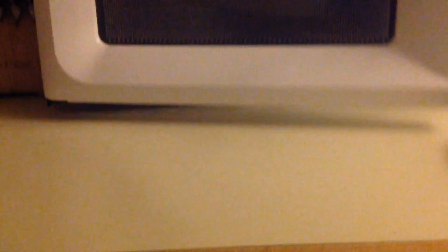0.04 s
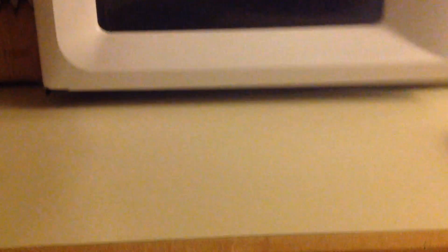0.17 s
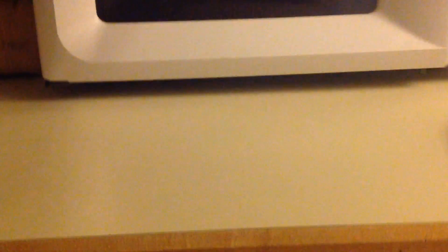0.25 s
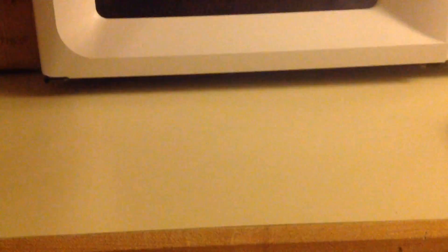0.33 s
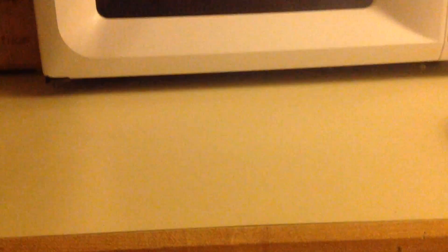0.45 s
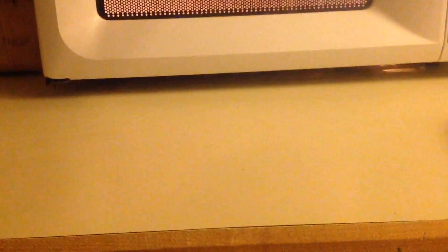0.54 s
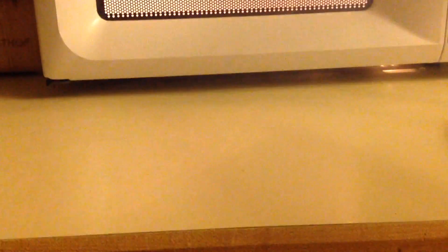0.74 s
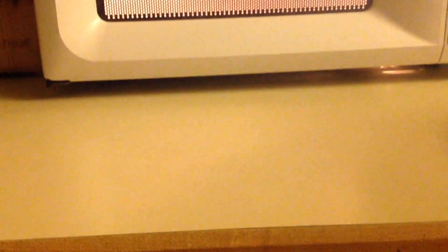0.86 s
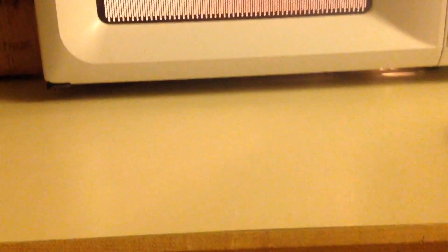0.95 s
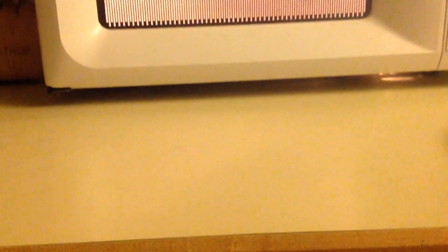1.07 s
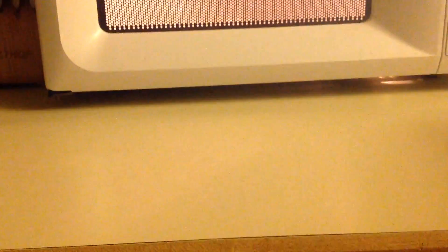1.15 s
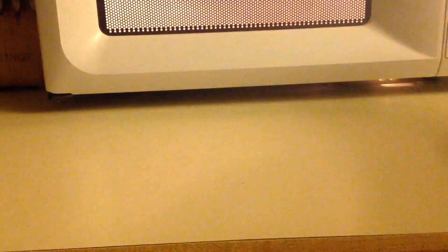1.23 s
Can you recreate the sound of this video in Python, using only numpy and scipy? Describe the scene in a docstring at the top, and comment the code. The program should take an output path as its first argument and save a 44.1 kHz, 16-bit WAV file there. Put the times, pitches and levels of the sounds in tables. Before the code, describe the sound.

Plastic knocks of a microwave door latching shut, followed by a soft electric hum.

```python
"""First come a few plastic knocks: a microwave door is pushed shut, close by in a small kitchen.
Its latch hooks meet their ramps, scrape and squeak over them, then snap in as the door hits the cabinet.
Each blow makes the door, the cabinet and the latch ring. Then the oven starts: the transformer hums,
a fan blows, there is a faint tick like a relay's, and a soft buzz joins over the quiet room."""
import sys
import numpy as np
from scipy import signal
from scipy.fft import rfft, irfft
from scipy.io import wavfile
from scipy.ndimage import uniform_filter1d

SR = 44100
rng = np.random.default_rng(int(sys.argv[2]) if len(sys.argv) > 2 else 0)


def pcm_store(signal):
    """Save signal as 16-bit PCM."""
    levels = np.round(np.clip(np.atleast_2d(signal), -1, 1) * 32767)
    wavfile.write(sys.argv[1], SR, levels.astype(np.int16).T)


N = 57330
MAINS_HZ = 60


def gain(db):
    """Turn decibels into a number to multiply a sound by."""
    return 10 ** (np.asarray(db) / 20)


def at_pitch(hz, points):
    """Read between (frequency, value) points, giving every octave the same width."""
    freqs, values = np.array(points, float).T
    return np.interp(np.log(np.maximum(hz, 1)), np.log(freqs), values)


def noise(colour, peaky_db=0, peak_width_hz=32):
    """Noise of average strength (rms) 1, shaped by a colour table; peaky_db adds random narrow peaks."""
    hz = np.fft.rfftfreq(N, 1 / SR)
    heights = np.clip(rng.standard_normal(4096), -3, 1.2)
    peaks = np.interp(hz / peak_width_hz, np.arange(4096), heights)
    white = rfft(rng.standard_normal(N))
    shaped = irfft(white * gain(at_pitch(hz, colour) + peaky_db * peaks), N)
    return shaped / shaped.std()


def wander(rate_hz):
    """A smooth random drift, typically about 1 up or down."""
    width = max(int(SR / rate_hz), 1)
    drift = uniform_filter1d(uniform_filter1d(rng.standard_normal(N), width), width)
    return drift / drift.std()


def since(start):
    """Seconds since a moment, zero before it."""
    return np.maximum(np.arange(N) / SR - start, 0)


def fade_in(start, rise_s):
    """A straight rise from 0 to 1."""
    return np.minimum(since(start) / rise_s, 1)


def ring(age, rise_s, ring_s):
    """Rise quickly, then die away; the ring time is how long a fall of 60 dB takes."""
    return (1 - np.exp(-age / rise_s)) * np.exp(-np.log(1000) * age / ring_s)


def octaves(sound):
    """Split a sound into overlapping octaves, each given as (centre frequency, band)."""
    centres = 125 * 2. ** np.arange(8)
    spectrum, hz = rfft(sound), np.fft.rfftfreq(N, 1 / SR)
    for centre in centres:
        share = at_pitch(hz, list(zip(centres, centres == centre)))
        yield centre, irfft(spectrum * share, N)


def hum(tones, start, waver_db=1.6):
    """Electric hum: tones at whole multiples of the mains frequency, each wavering and slowly fading."""
    total = 0
    for multiple, db, fall in tones:
        level_db = db - fall * since(start) + waver_db * wander(30)
        total += np.sqrt(2) * gain(level_db) * np.cos(2 * np.pi * multiple * MAINS_HZ * since(0))
    return total


# Colour of the quiet kitchen (frequency [Hz], relative level [dB])
ROOM_COLOUR = [(18, -84), (30, -57), (228, 0), (288, -7), (437, -4.5), (581, -12.5), (680, -12.5),
               (735, -14.5), (1140, -19), (1920, -27.5), (3590, -36.5), (3880, -30.5), (5170, -39),
               (15000, -42.5)]
# Its faint hum (multiple of the mains [x], level [dB], fall [dB/s])
ROOM_TONES = [(4, -60, 0.022), (6, -57.5, 0.009)]
def room():
    """The kitchen's low, steady rush with a trace of mains hum."""
    return gain(-48) * noise(ROOM_COLOUR) + hum(ROOM_TONES, 0)


# Colour of the buzz (frequency [Hz], relative level [dB])
BUZZ_COLOUR = [(500, -35), (1400, 5), (2300, 0.5), (3200, 5.5), (3800, -6.5), (4800, -5), (6500, -16.5),
               (15000, -27)]
def buzz(start, fall_db_per_s=4, depth=0.24):
    """A soft buzz: hiss that pulses at twice the mains frequency."""
    loudness = fade_in(start, rise_s=0.025) * gain(-55 - fall_db_per_s * since(start))
    pulsing = 1 + depth * np.sin(2 * np.pi * 2 * MAINS_HZ * since(0))
    return loudness * pulsing * noise(BUZZ_COLOUR, peaky_db=8.5)


# Colour of the tick (frequency [Hz], relative level [dB])
TICK_COLOUR = [(300, -16.5), (2500, -9), (5000, 5), (7500, 1), (12500, 0.5), (15000, -6)]
def tick(start):
    """A faint, bright tick, like a relay (an electric switch) closing."""
    return gain(-50) * noise(TICK_COLOUR) * ring(since(start), rise_s=0.0039, ring_s=0.28)


# Colour of the moving air (frequency [Hz], relative level [dB])
FAN_COLOUR = [(30, -42), (80, -39), (130, -14), (185, 2), (280, 3.5), (400, 6.5), (550, -10.5), (800, -4.5),
              (1250, -11.5), (2200, -15), (3200, -19.5), (4500, -24.5), (7000, -35), (15000, -39)]
def fan(start, fall_db_per_s=7):
    """The fan's rush of air comes in quickly, then eases off."""
    loudness = fade_in(start, rise_s=0.08) * gain(-45.5 - fall_db_per_s * since(start))
    return loudness * noise(FAN_COLOUR)


# Tones of the oven's hum (multiple of the mains [x], starting level [dB], fall [dB/s])
TRANSFORMER_TONES = [(2, -62, 20), (3, -51.5, 7.5), (4, -40, 16), (5, -72, 10), (6, -39, 2.5), (8, -54, 0),
                     (10, -63, 2), (12, -62, 8), (20, -60, 5.5)]
def transformer(start):
    """Mains current makes the transformer hum; the hum settles after switching on."""
    return fade_in(start, rise_s=0.08) * hum(TRANSFORMER_TONES, start)


# Loudness of the sliding hooks (time [s], level [dB])
SLIDE_LEVELS = [(.25, -59), (.28, -29.5), (.298, -19.5), (0.319, -28), (.338, -27), (.36, -44.5),
                (0.392, -36), (.41, -60)]
# Colour of their scraping (frequency [Hz], relative level [dB])
SCRAPE_COLOUR = [(60, -33), (140, 17), (450, 1), (1000, 0), (1400, -8), (3200, -7), (4600, -9.5),
                 (6200, -28), (15000, -46)]
def hook_scrape(flicker_db=0.5):
    """The latch hooks stick and slip along their ramps, so the scrape flickers a little."""
    times, levels = np.array(SLIDE_LEVELS).T
    slide_db = np.interp(since(0), times, levels, left=-120, right=-120)
    slip_db = flicker_db * (wander(500) - 1)
    return gain(slide_db + slip_db) * noise(SCRAPE_COLOUR, peaky_db=1)


def hook_squeak(start, pitch_hz=4600, jitter=0.0159, hold_s=0.023, fade_s=0.0088):
    """The rubbing hooks give one short, high squeak with a shaky pitch."""
    hz = pitch_hz * (1 + jitter * wander(510))
    phase = 2 * np.pi * np.cumsum(hz) / SR
    loudness = fade_in(start, rise_s=0.00074) * np.exp(-since(start + hold_s) / fade_s)
    return gain(-36.5) * loudness * np.sin(phase)


def deep_thump(start, pitch_hz=26):
    """A very deep, short thump at the slam."""
    age = since(start)
    return gain(-25) * np.sin(2 * np.pi * pitch_hz * age) * ring(age, rise_s=0.0013, ring_s=0.041)


# Where a clatter's low, middle and high levels apply (frequency [Hz])
CLATTER_PITCHES = [600, 3000, 9000]
# Colour of the sharp crack that opens a clatter (frequency [Hz], relative level [dB])
CRACK_COLOUR = [(30, -21), (80, -27), (250, 6.5), (600, 1.5), (850, 2), (1100, 3.5), (1700, -5),
                (2400, -6.5), (4500, -6), (6500, -14.5), (9500, -13.5), (15000, -31.5)]
# Colour of the ringing tail after it (frequency [Hz], relative level [dB])
TAIL_COLOUR = [(30, -62), (80, -26), (130, -6.5), (210, -9), (350, 2.5), (700, 1.5), (1100, -5),
               (1300, -5.5), (2200, -9.5), (4500, -13), (6300, -18), (9500, -18.5), (15000, -28)]
# How long that tail lasts in the kitchen (frequency [Hz], ring time [s])
KITCHEN_RING_TIMES = [(120, 0.83), (500, 0.42), (1500, 0.47), (4500, 0.42), (9000, 0.31), (15000, 0.22)]
def clatter(start, low_db, middle_db, high_db, crack_db, rise_s=0.0039):
    """Plastic and sheet metal ring at many pitches at once: a crack, a tail, then lingering metal."""
    age = since(start)
    balance = list(zip(CLATTER_PITCHES, (low_db, middle_db, high_db)))
    crack = sum(gain(at_pitch(hz, balance)) * band for hz, band in octaves(noise(CRACK_COLOUR)))
    crack *= ring(age, rise_s=0.0012, ring_s=0.039)
    tail = 0
    for hz, band in octaves(noise(TAIL_COLOUR)):
        fading = ring(age, rise_s, at_pitch(hz, KITCHEN_RING_TIMES))
        tail += gain(at_pitch(hz, balance)) * band * fading
    metal = noise(TAIL_COLOUR, peaky_db=5.5) * ring(age, rise_s, ring_s=0.73)
    return gain(crack_db) * crack + gain(-2.5) * tail + gain(middle_db - 22.5) * metal


def struck(tones, start, swell_cycles=1.56):
    """A struck part rings with its own tones; each builds up over a few cycles and dies away."""
    age = since(start)
    return sum(gain(db) * np.sin(2 * np.pi * hz * age) * ring(age, swell_cycles / hz, ring_s)
               for hz, db, ring_s in tones)


# Tones of the door (frequency [Hz], relative level [dB], ring time [s])
DOOR_TONES = [(133.3, -10, 0.32), (145.9, -2.5, .3), (255.3, -17, 0.41), (353, 0.5, 0.2), (474, -12, 0.15),
              (527, -10, 0.19), (718, -29, 0.17), (806.7, -26.5, 0.62), (932, -9.5, 0.076)]
# Tones of the cabinet (frequency [Hz], relative level [dB], ring time [s])
CABINET_TONES = [(159.95, 2, 0.36), (178.4, -6, 0.41), (283.1, -3.5, 0.47), (327, -14, 0.22),
                 (379.7, -16, 0.69), (421.2, -20, 0.47), (460.2, -11.5, .4), (503.7, -6.5, 0.42),
                 (560, -12.5, 0.12), (692, -12, 0.31), (713, -17, 0.64), (838, -10.5, 0.28),
                 (1007, -16.5, 0.35), (1086, -15, 0.51)]
# Tones of the latch and its bracket (frequency [Hz], relative level [dB], ring time [s])
LATCH_TONES = [(1146, -8, .25), (1384, -2.5, 0.32), (1620, -2, 0.47), (1656, 1.5, 0.13), (1960, -9, 0.21),
               (2030, -23, 0.8), (2252, -15.5, 0.66), (2644, -1.5, 0.14), (2918, -3, 0.2),
               (3500, -21, 0.13), (3940, -3.5, 0.19), (4147, -16, 0.44), (4340, -19, 0.31),
               (4750, -12.5, 0.49)]
# Each blow and how strongly it stirs each sound (time [s], door [dB], cabinet [dB],
# low clatter [dB], middle clatter [dB], high clatter [dB], extra gain for the crack [dB])
DOOR_BLOWS = [(0.2310, -58, -46, -21, -31, -29, 5), (0.2380, -34, -50, -33, -29, -22.5, 8.5),
              (0.2402, -10, -36, -23.5, -32, -54, -25), (0.2862, -46, -39, -30, -26.5, -29, 5),
              (0.3025, -22.5, -22.5, -29.5, -25.5, -37, 2.5), (0.3464, -20, -24, -27.5, -34, -28.5, 10),
              (0.478, -61, -36, -33, -47, -76, -3), (0.489, -51, -46, -28, -34.5, -34, 5.5),
              (0.5008, -16.5, -15, -16, -23.5, -23, 4), (0.525, -16, -48, -14.5, -14, -10, 7.5),
              (0.5273, -18.5, -14, -16, -15, -31, 11)]
def door_blows(bass_edge_hz=113):
    """Every blow rings the door, cabinet and latch and sets off a clatter."""
    blows = np.zeros(N)
    for start, door_db, cabinet_db, low_db, middle_db, high_db, crack_db in DOOR_BLOWS:
        blows += gain(door_db) * struck(DOOR_TONES, start)
        blows += gain(cabinet_db) * struck(CABINET_TONES, start)
        blows += gain(middle_db - 13) * struck(LATCH_TONES, start)
        blows += clatter(start, low_db, middle_db, high_db, crack_db)
    # The deep bass of the blows is cut.
    bass_cut = signal.butter(4, bass_edge_hz, "high", fs=SR, output="sos")
    return signal.sosfilt(bass_cut, blows)


def scene():
    """The door shuts and the oven starts in the quiet kitchen; start times are in seconds."""
    closing = door_blows() + hook_scrape() + hook_squeak(start=0.264) + deep_thump(start=0.526)
    running = transformer(start=0.61) + fan(start=0.61) + tick(start=0.788) + buzz(start=1.05)
    return (closing + running + room())[None]


def record(dry, top_hz=15400):
    """Peaks stop at full scale and the very highest treble is cut."""
    treble_cut = signal.ellip(10, .2, 70, top_hz, fs=SR, output="sos")
    return signal.sosfilt(treble_cut, np.clip(dry, -1, 1))


dry = scene()
out = record(dry)
pcm_store(out)
```